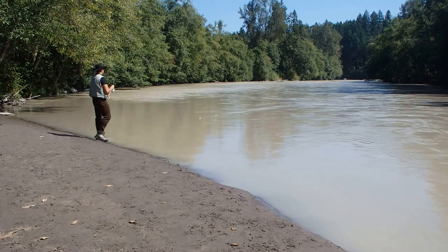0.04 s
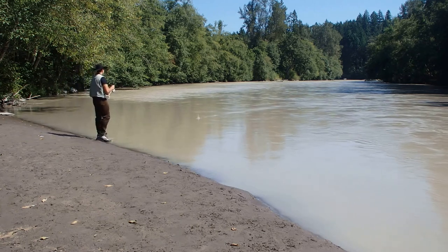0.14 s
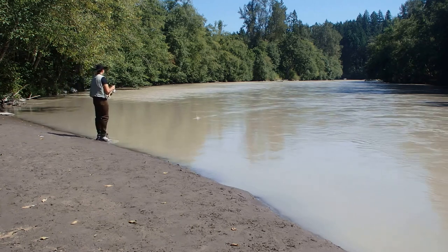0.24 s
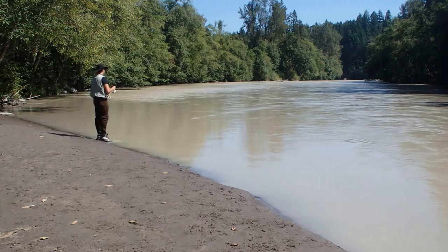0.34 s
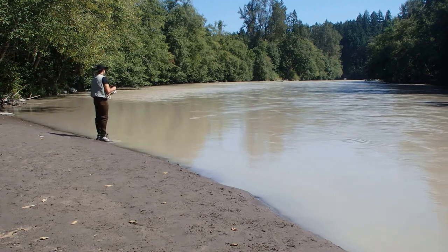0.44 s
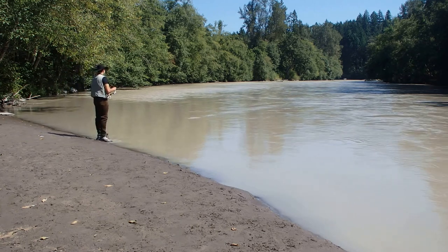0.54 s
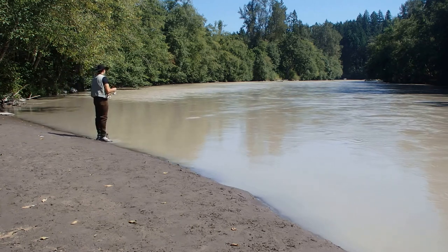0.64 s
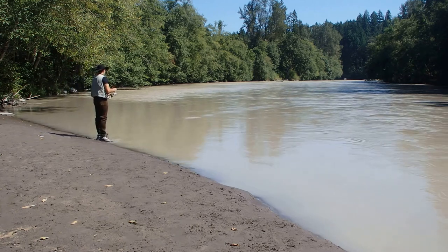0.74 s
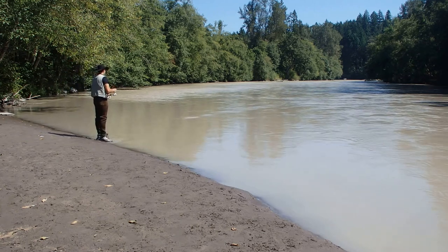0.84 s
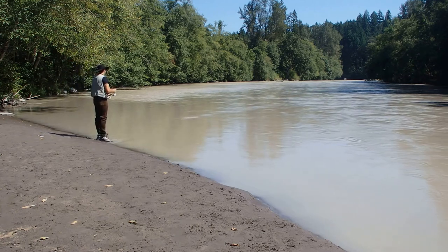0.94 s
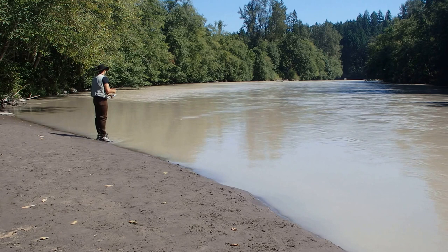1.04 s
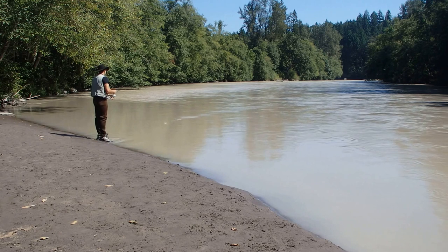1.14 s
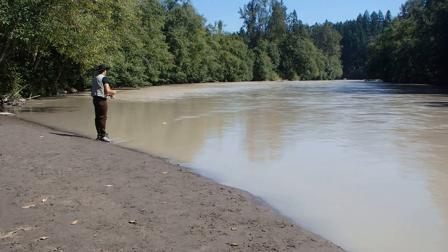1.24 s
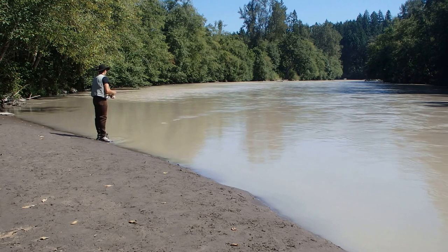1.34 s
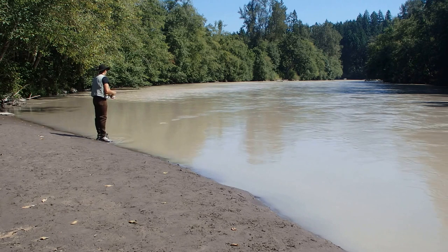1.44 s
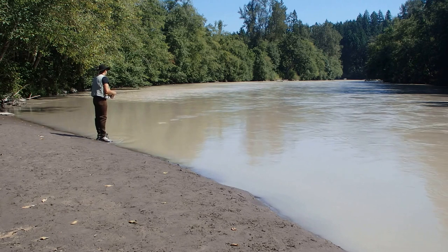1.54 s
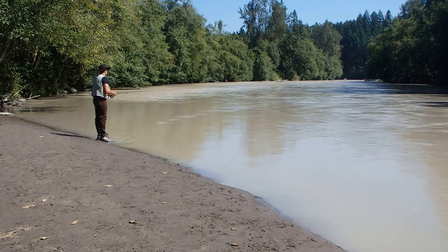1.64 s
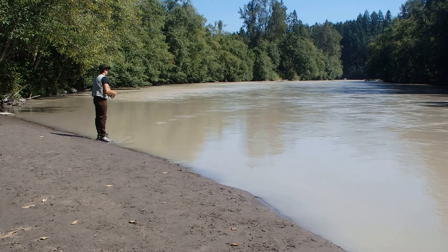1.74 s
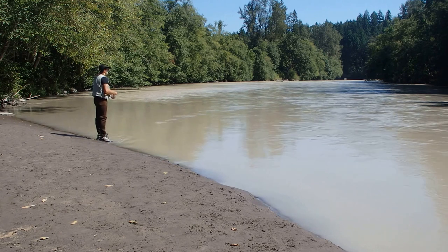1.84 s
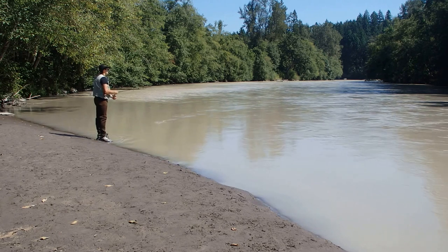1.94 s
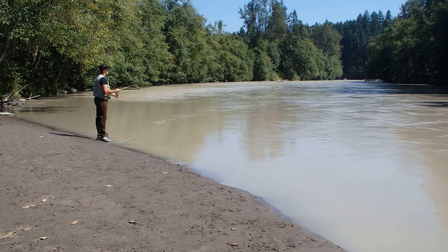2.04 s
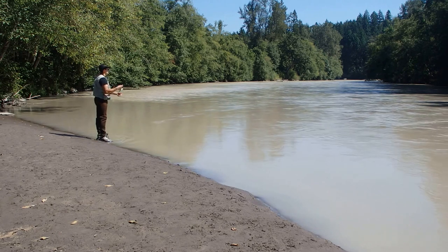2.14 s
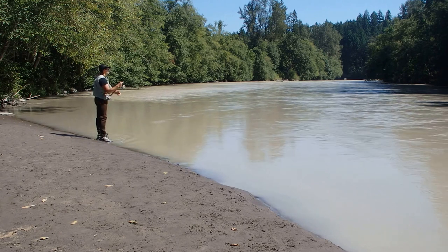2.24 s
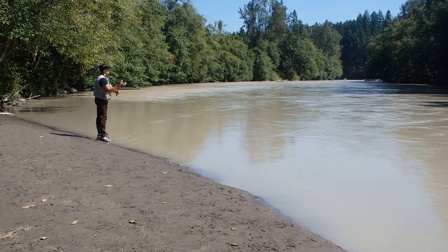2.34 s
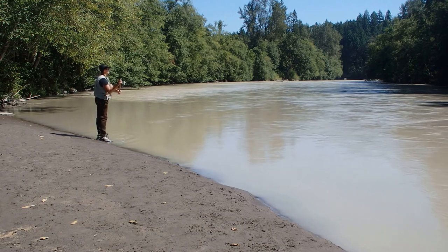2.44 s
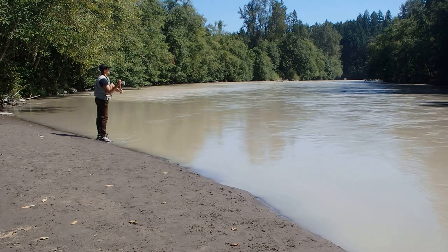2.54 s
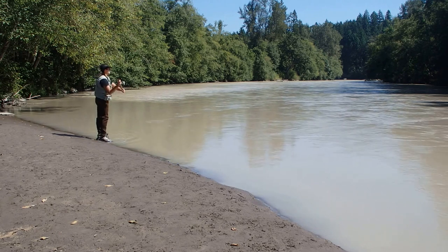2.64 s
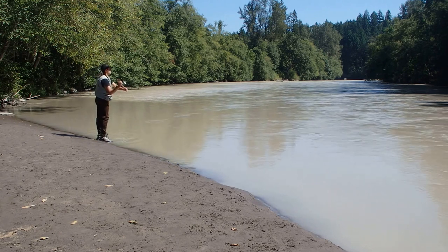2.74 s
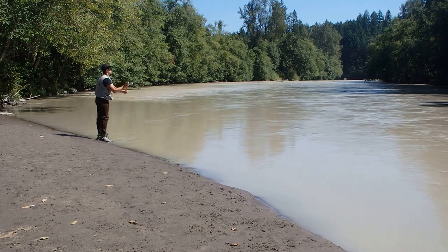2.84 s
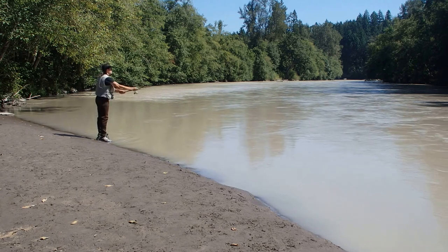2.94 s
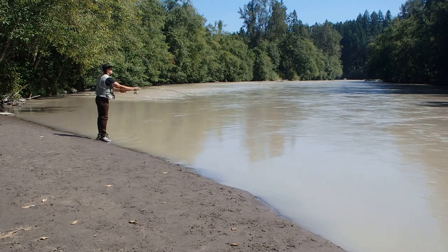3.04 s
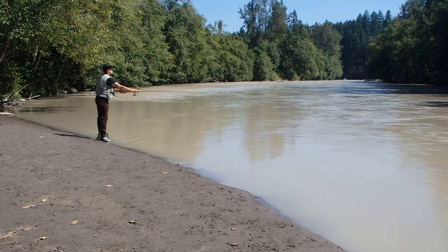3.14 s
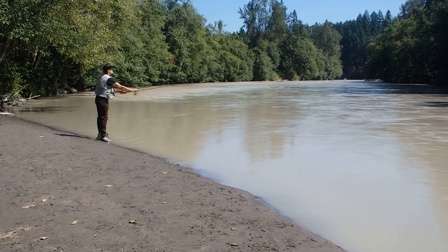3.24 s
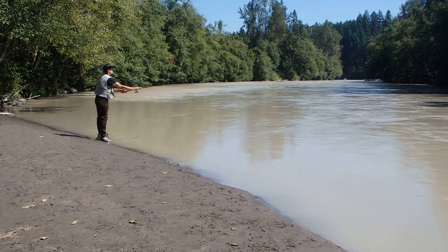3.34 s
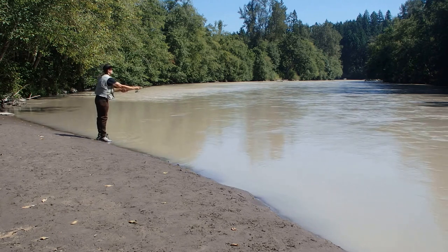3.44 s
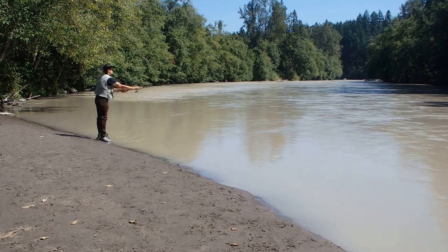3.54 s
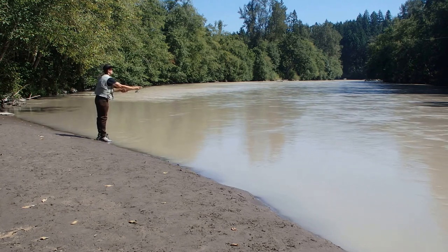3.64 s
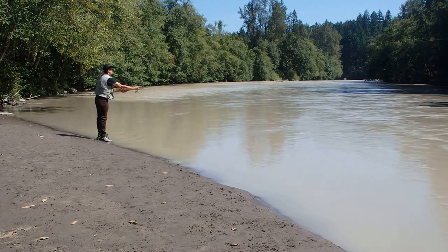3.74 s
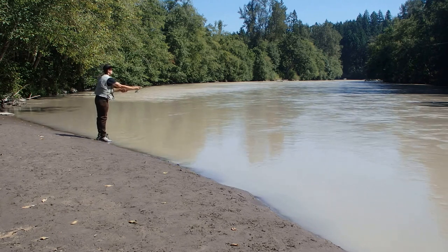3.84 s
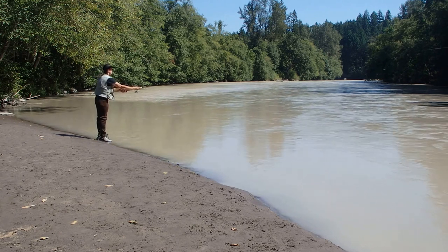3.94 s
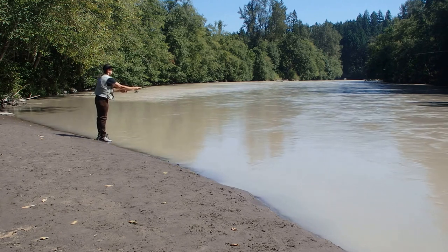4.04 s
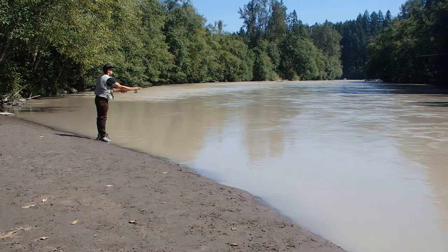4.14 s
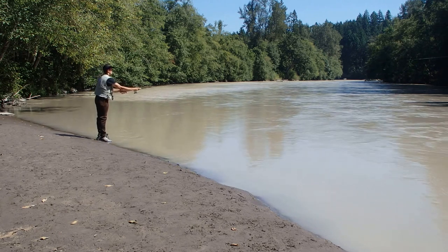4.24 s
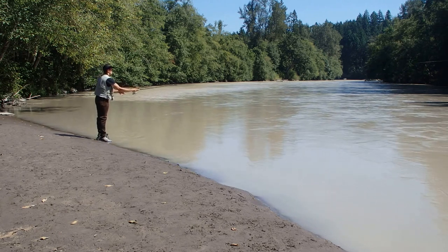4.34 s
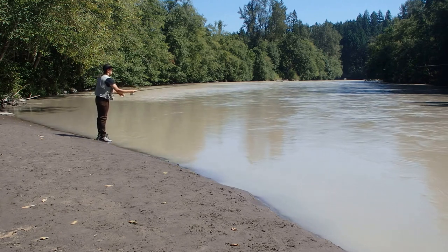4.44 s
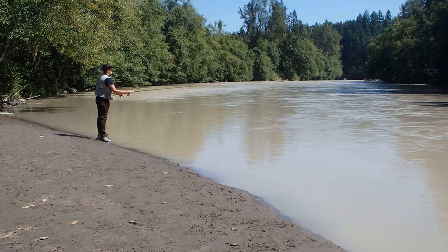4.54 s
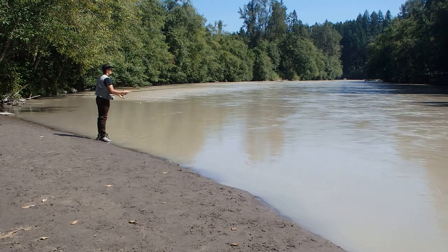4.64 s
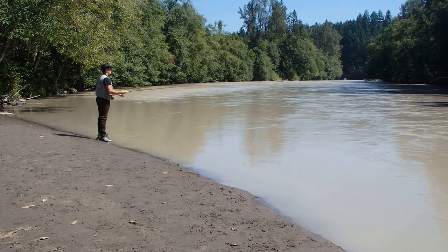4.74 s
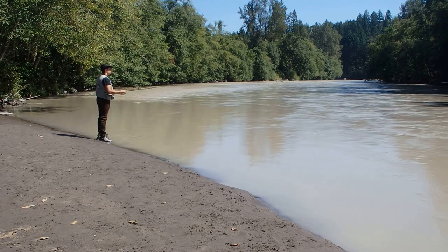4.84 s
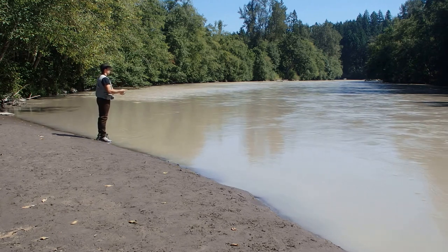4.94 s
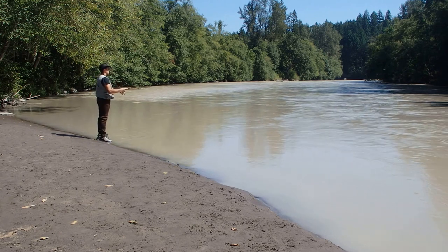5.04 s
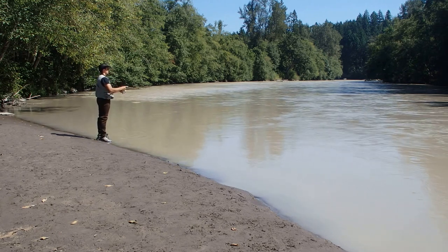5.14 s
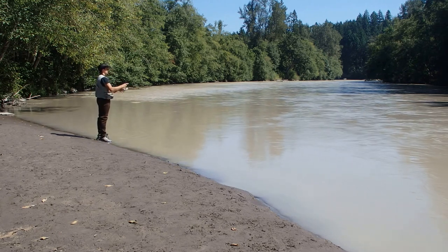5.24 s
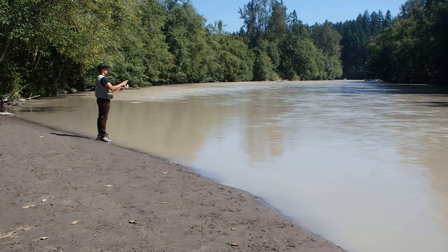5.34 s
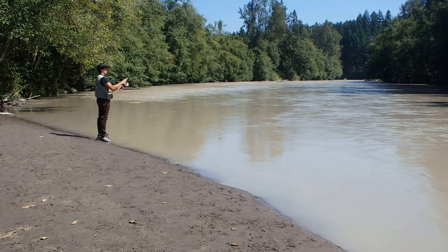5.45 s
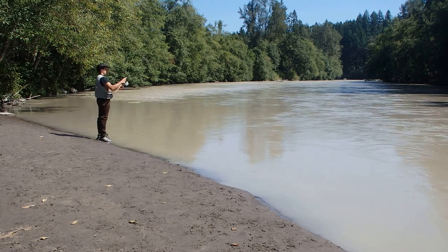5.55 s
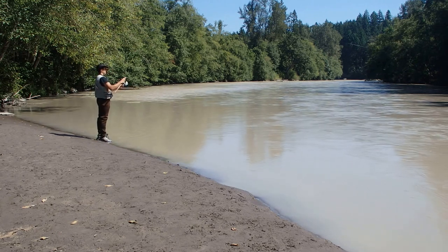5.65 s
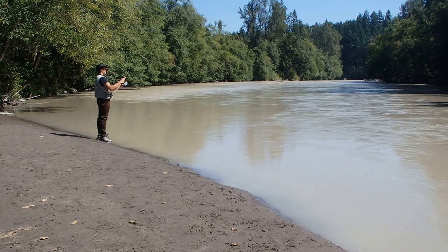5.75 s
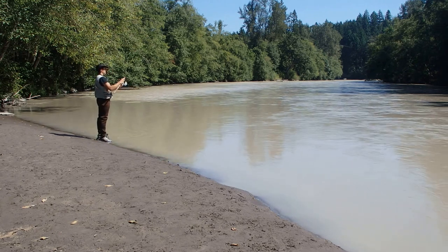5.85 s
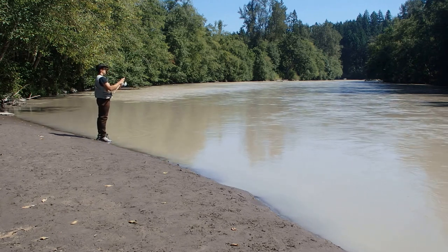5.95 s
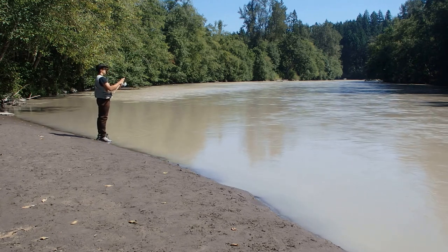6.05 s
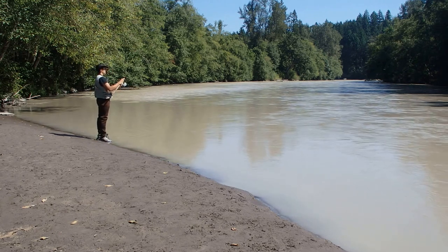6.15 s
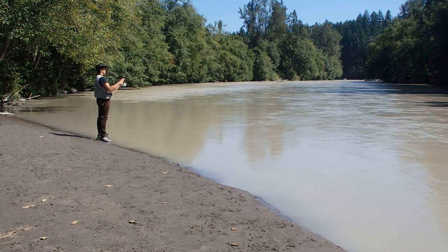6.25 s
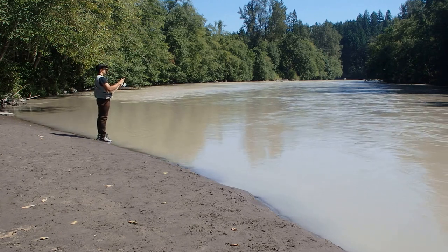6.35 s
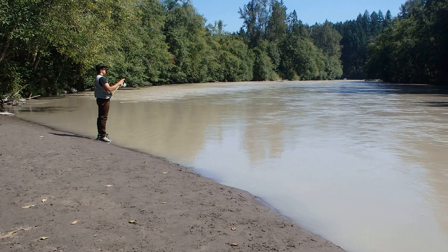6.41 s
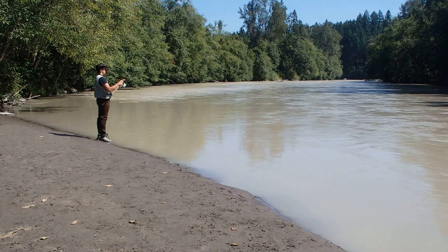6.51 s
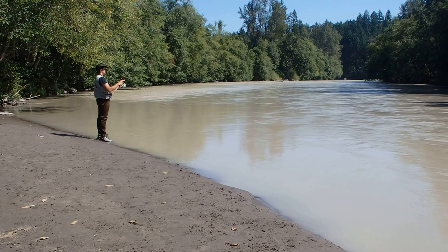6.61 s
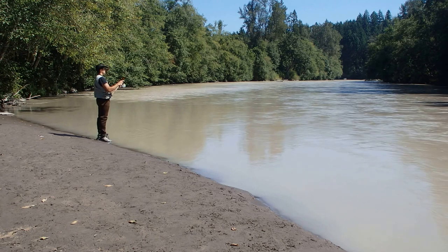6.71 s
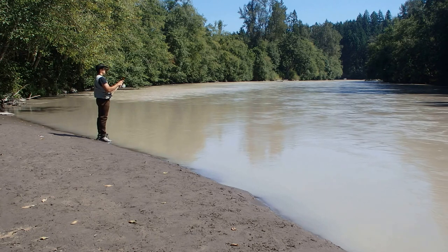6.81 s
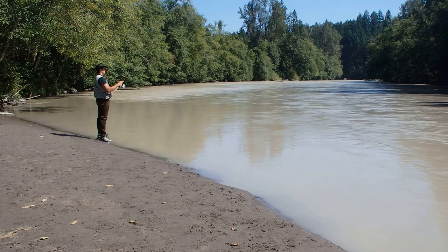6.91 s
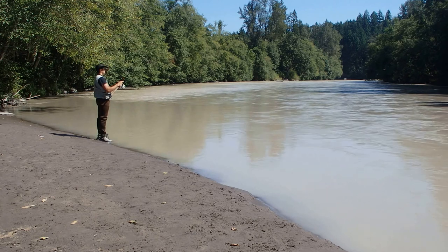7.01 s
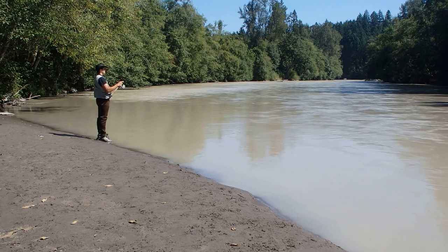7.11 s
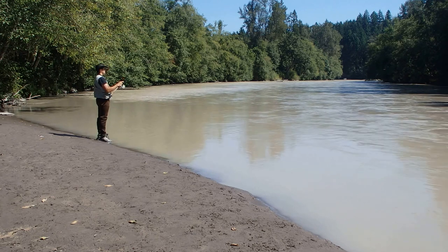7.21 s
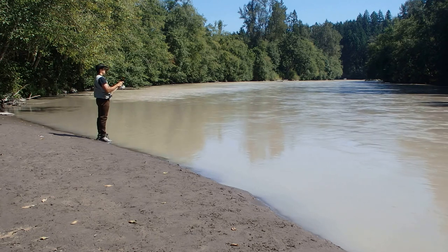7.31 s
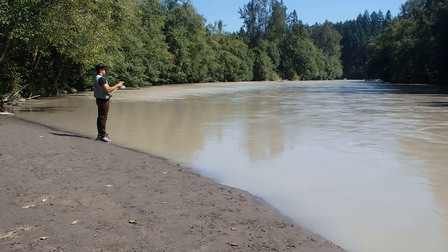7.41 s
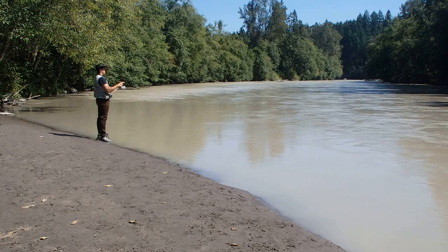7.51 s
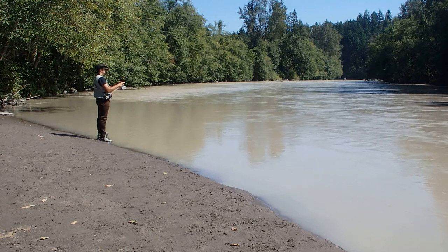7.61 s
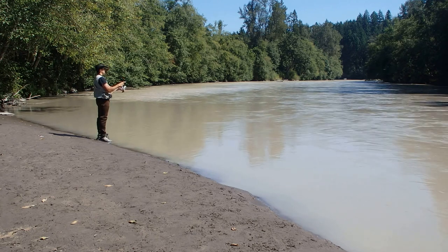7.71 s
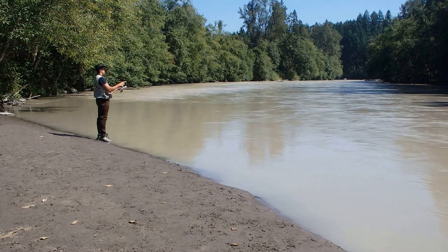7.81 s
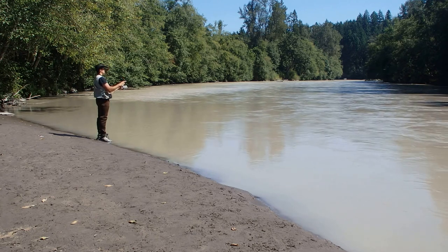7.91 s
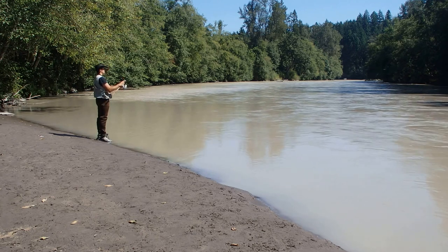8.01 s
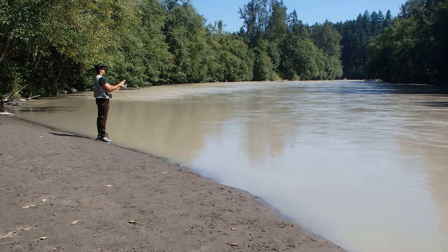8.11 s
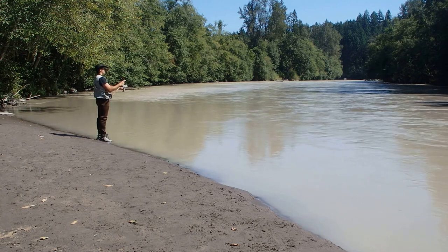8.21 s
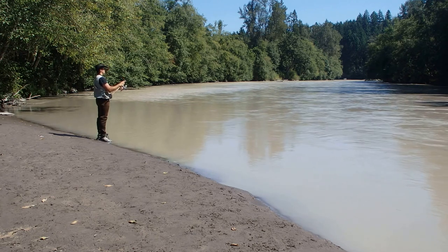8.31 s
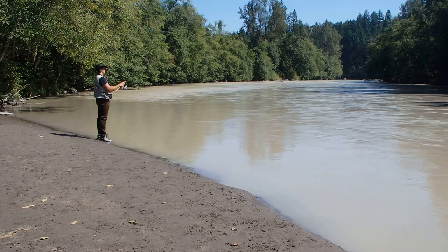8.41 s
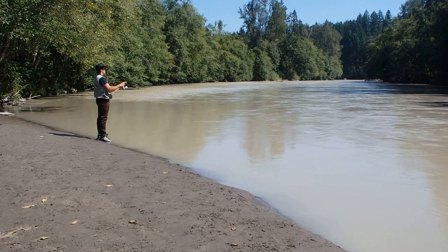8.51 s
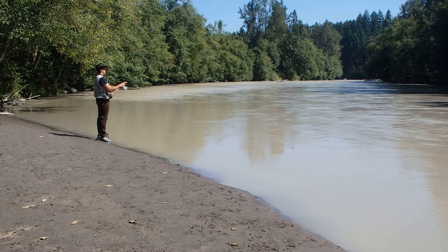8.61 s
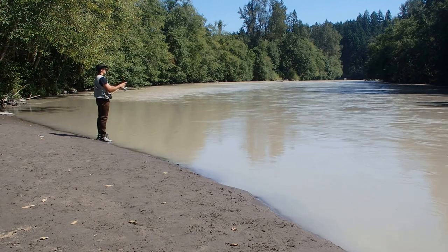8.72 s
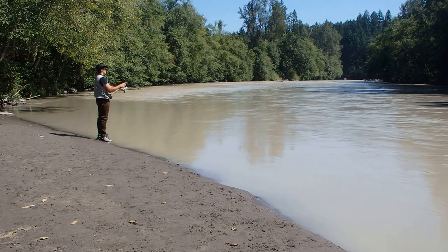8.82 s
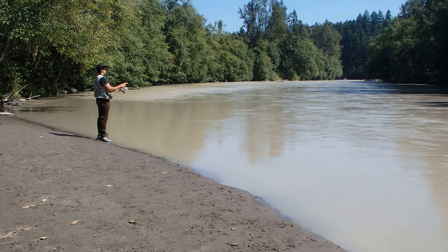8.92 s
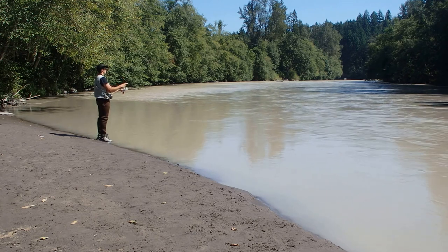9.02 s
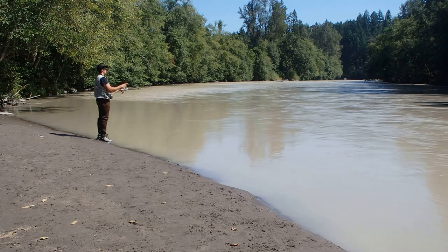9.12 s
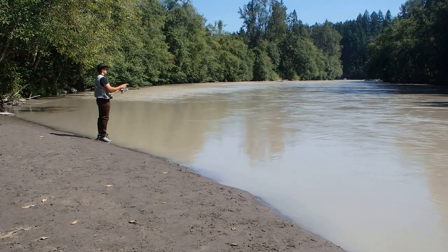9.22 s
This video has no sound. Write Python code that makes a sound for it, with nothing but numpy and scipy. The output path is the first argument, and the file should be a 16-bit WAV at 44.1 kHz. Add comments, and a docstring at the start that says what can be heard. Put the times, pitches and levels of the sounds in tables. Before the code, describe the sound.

Throughout, a wide, even river murmur with a fine fizz of bubbles sits over a slowly heaving low rumble, a faint wavering hum and light microphone hiss. At 0.3 to 0.6 seconds, a few small dry reel ticks come from the left, under a barely audible high whistle. Around 1.4 to 1.8, more faint ticks and several watery plips, one lower and rising quickly. From 2.5 a very thin, high line hiss flutters; near 3.0 the lure breathes past, and at 3.2 the rod whips forward in one loud, bright, airy swish lasting about a tenth of a second. Trees return a diffuse, fading tail for about a second. At 5.1 the reel snaps shut in a rapid cluster of metallic clacks, with one lighter tick after. Then the river continues, with scattered plips from 6.5 to 7.9, the faint whistle near 7.3, and two weak ticks around 7.4 and 7.65, ending on water and rumble at 9.3.

```python
"""A sandy river bank, a small camera, an angler to its left; the river murmurs all around, as noise with tiny
bubbles over a far rumble and a low wavering hum, and rising sine bubbles plip at the edge now and then.
First the reel ticks, as ringing modes, under a faint far whistle; line and lure hiss on the back swing and
the rod whips forward, as tones of shed eddies in a broad wake. The trees answer as a late, decaying noise
tail. Then the reel clacks shut, and near the end the whistle and a few reel ticks return."""
import sys
import numpy as np
from scipy import signal
from scipy.fft import rfft, irfft, next_fast_len
from scipy.io import wavfile
from scipy.ndimage import uniform_filter1d, minimum_filter1d, map_coordinates

SR = 44100
rng = np.random.default_rng(int(sys.argv[2]) if len(sys.argv) > 2 else 0)


def wav_record(signal):
    """Record a signal, one row per channel, as 16-bit PCM in the file named by sys.argv[1]."""
    frames = np.transpose(np.atleast_2d(signal))
    bounded = np.clip(frames, -1, 1)
    # unit amplitude maps onto the largest positive 16-bit level
    quanta = np.round(bounded * 32767).astype(np.int16)
    wavfile.write(sys.argv[1], SR, quanta)


N = 408807

# Shade of the camera body on the right port, for sound from the left: f/Hz, level/dB
BODY_SHADE = [(1000, 0), (2400, 0), (3400, .5), (4200, -1), (5000, -7), (5800, -17), (7200, -22),
              (11000, -18)]


def amp(db):
    """dB to gain."""
    return 10 ** (np.asarray(db) / 20)


def unit(x):
    """x at rms 1."""
    return x / np.sqrt(np.mean(np.abs(x) ** 2) + 1e-20)


def along(points, hz):
    """Read a table of f/Hz and value at hz, straight lines on a log frequency axis."""
    f, value = np.transpose(points)
    return np.interp(np.log(hz + 1), np.log(f + 1), value)


def curves(rows):
    """One value per sample for each column after the time."""
    s, *columns = np.transpose(rows)
    return [np.interp(np.arange(N) / SR, s, column) for column in columns]


def wobble(rate):
    """A smooth random curve with rate knots a second."""
    knots = rng.standard_normal(int(N * rate / SR) + 4)
    return map_coordinates(knots, [np.arange(N) * rate / SR])


def swell(t, loudest_s, db, rise_s, fall_s):
    """A rounded level in dB, 20 dB down at rise_s before and fall_s after its loudest moment."""
    return db - 20 * ((t - loudest_s) / np.where(t < loudest_s, rise_s, fall_s)) ** 2


def filtered(x, response):
    """x times a complex response of frequency."""
    m = next_fast_len(N + SR // 2)
    hz = np.fft.rfftfreq(m, 1 / SR)
    return irfft(rfft(x, m) * response(hz), m)[..., :N]


def ports(hz, left_minus_right_db):
    """Gains of the two microphone ports: a level step, and a phase lead of the left one."""
    # Phase by which the left port leads: f/Hz, lead/rad
    left_lead = [(1000, 0), (2800, 0.27), (3400, 0.73), (4400, 1.4), (5300, 1.7), (6400, 0.68), (9000, 0)]
    side = np.array([[1], [-1]])
    return amp(side * left_minus_right_db / 2) * np.exp(.5j * side * along(left_lead, hz))


def wide(spectrum, pair):
    """Two unrelated signals mixed to a coloured stereo pair of rms 1, as sound from all around."""
    # Likeness of left and right before the port differences: f/Hz, correlation/1
    likeness = [(60, 0.93), (270, 0.92), (740, .96), (2000, 0.93), (3300, 0.99), (5000, 0.9)]
    # Balance of the ports: f/Hz, left minus right/dB
    balance = [(60, 1.5), (450, 0.51), (2000, 0.4), (3300, -1.4), (5000, 2.5)]

    def mid_side(hz):
        turn = np.arccos(np.clip(along(likeness, hz), -1, 1)) / 2
        return amp(along(spectrum, hz)) * [np.cos(turn), np.sin(turn)]

    mid, side = filtered(pair, mid_side)
    left_right = np.array([mid + side, mid - side])
    return unit(filtered(left_right, lambda hz: ports(hz, along(balance, hz))))


def shedding(hz, db, spread, rough):
    """A tone on a moving pitch, blurred by eddies that last 1 / spread cycles; rough = their share of the power."""
    cycles = np.cumsum(hz) / SR
    knots = rng.standard_normal((2, int(cycles[-1] * spread) + 4))
    re, im = (map_coordinates(k, [cycles * spread], order=1) for k in knots)
    rough = np.clip(rough, 0, 1)
    blur = np.sqrt(1 - rough) + np.sqrt(rough) * unit(re + 1j * im)
    return amp(db) * np.sqrt(2) * np.real(blur * np.exp(2j * np.pi * cycles))


def bubbles(s, db, hz, climb, life_cycles):
    """Damped sines with a soft start whose pitch rises as the bubble nears the surface."""
    age = np.arange(900) * hz[:, None] / SR  # cycles of the starting pitch
    life = age / life_cycles  # the ring is 60 dB down at 1
    bend = 1 + np.reshape(climb, (-1, 1)) * life  # acts on phase: the pitch itself gains twice the climb
    soft_start = 1 - np.exp(-age / 0.84)
    tone = np.sin(2 * np.pi * age * bend) * amp(db[:, None] - 60 * life) * soft_start
    at = np.round(s * SR).astype(int)[:, None] + np.arange(age.shape[1])
    return np.bincount(at.ravel(), tone.ravel(), N + SR)[:N]


def hum():
    """Two wavering low tones an octave apart come and go, slightly stronger on the left."""
    # Mean level of the two ports: t/s, low note level/dB, high note level/dB
    hum_levels = [(0.0, -54, -51), (1.0, -57, -54), (1.5, -47, -55), (2.6, -48.5, -47), (3.0, -50, -57),
                  (3.6, -54, -56), (4.0, -48.5, -49), (4.7, -46.5, -66), (5.2, -55, -57.5),
                  (6.3, -42, -53.5), (7.7, -47, -56.5), (8.4, -54, -62.5), (9.27, -41.5, -45.5)]
    low_db, high_db = curves(hum_levels)
    hz = 76.6 + 0.61 * wobble(1.6)
    low = shedding(hz, low_db, .04, 0.15)
    high = shedding(2 * hz, high_db, .06, 0.33)
    return (low + high) * amp([[.7], [-.7]])


def river():
    """Far water is smooth noise; ripples add a fine fizz of tiny bubbles; the rumble heaves slowly."""
    # Slow course of both, before the random wobble: t/s, river level/dB, rumble level/dB
    flow = [(0, -44.5, -42), (1.2, -44, -43), (2.2, -44.5, -42.5), (4.1, -44.2, -41.5), (5.4, -44.5, -44),
            (6.3, -44.5, -40.5), (8.3, -43.5, -41.5), (9.27, -44, -43.5)]
    # Colour of the water, relative: f/Hz, level/dB
    water_colour = [(120, -62), (190, -3), (283, -2), (420, -0.5), (700, -3.5), (1110, -7.5), (2050, -11.5),
                    (2350, -13), (2800, -13.5), (3450, -18), (3650, -22), (3900, -20), (4500, -24),
                    (5500, -28.5), (8000, -44)]
    # Colour of the far rumble, relative: f/Hz, level/dB
    rumble_colour = [(12, -34), (20, -14), (40, 3.5), (70, -0.5), (92, 4.5), (152, -3.5), (184, -9),
                     (220, -13.5), (290, -31), (480, -120)]
    river_db, rumble_db = curves(flow)
    when, size, pitch = rng.random((3, 3000))
    ripples = bubbles(when * N / SR, 6 * size, 1500 * 3.5 ** pitch, .1, life_cycles=12)
    pair = rng.standard_normal((2, N))
    pair[0] += 0.16 * unit(ripples)
    water = amp(river_db + 0.48 * wobble(6)) * wide(water_colour, pair)
    rumble = wide(rumble_colour, rng.standard_normal((2, N)))
    return water + amp(rumble_db + 1.1 * wobble(2.43)) * rumble


def whistle():
    """A faint fuzzy tone far off swells and fades, its narrow band all random blur."""
    # The two swells: loudest t/s, level/dB, rise/s, fall/s
    whistle_swells = [(.3, -72, .35, .25), (7.3, -69, .3, .3)]
    t = np.arange(N) / SR
    level = sum(amp(swell(t, *row)) for row in whistle_swells)
    return level * shedding(np.full(N, 5330), 0, .08, 1)


def trees(x):
    """The wooded banks answer 30 ms late as a noise tail, each frequency dying at its own speed."""
    # Decay of the far tree line: f/Hz, t60/s
    tree_t60 = [(500, .4), (2200, 1.5), (3150, 1.5), (3800, 0.7), (4400, 2.1), (5500, 1), (10000, 1.5)]
    # Colour of the whole answer, relative: f/Hz, level/dB
    leaf_colour = [(700, 12), (1600, 0.5), (2500, -6), (3150, 2), (4300, -1.5), (5500, -8.5), (10000, -2)]
    hz, t, noise = signal.stft(rng.standard_normal((2, SR)), SR, nperseg=256)
    near_bushes = amp(-60 * t / 0.18)
    far_trees = amp(-2.5 - 60 * t / along(tree_t60, hz)[:, None])
    mid, side = signal.istft(noise * (near_bushes + far_trees), SR, nperseg=256)[1]
    tail = np.array([mid + 0.14 * side, mid - 0.11 * side]) / np.linalg.norm(mid)
    delayed = np.pad(x, (round(.03 * SR), 0))
    late = signal.fftconvolve(delayed[None], tail, axes=1)[:, :N]
    return filtered(late, lambda hz: amp(along(leaf_colour, hz)) * ports(hz, -.6 * along(BODY_SHADE, hz)))


def plips():
    """Single drops at the water's edge, each a bubble ringing at a rising pitch."""
    # Drops: t/s, starting level/dB before the soft start, starting f/Hz, climb (half the pitch gained in a life)/1
    drops = [(.349, -40, 3140, 0.092), (0.466, -37, 3050, .1), (1.581, -35, 3760, .1),
             (1.621, -28.5, 1126, 1.6), (1.787, -35, 730, 0.51), (3.12, -32, 2070, .1),
             (3.899, -39, 4000, .1), (4.629, -36, 2010, .2), (6.509, -33, 2040, 0.091),
             (6.929, -37, 3020, .1), (7.22, -40, 3920, .1), (7.547, -36, 3160, .1), (7.91, -43, 1150, .2)]
    return bubbles(*np.transpose(drops), life_cycles=39)


def reel():
    """Each contact rings the same modes at new strengths, some with more knock, some with more clack."""
    # Contacts as the reel is shut and handled: t/s, level/dB, low knock level/dB, bright clack level/dB
    contacts = [(0.2786, -44, -5, 1), (0.3617, -34, -6, -10), (0.379, -34, -7, -9),
                (0.5587, -24, -24, -12.5), (0.567, -40, -6, 2), (1.431, -35, 2, -10), (1.557, -42, 4, 0),
                (1.6095, -43, 1, 1), (5.093, -31, 6, -6), (5.0952, -30.5, 4, -3), (5.0988, -32, -6, -4),
                (5.103, -28.5, 0, -7), (5.1111, -35, -7, -5), (5.1147, -29, -1, -3), (5.1994, -40, 4, -8),
                (7.421, -43, -5, -2), (7.65, -40, -11, -7)]
    # What the reel rings with: f/Hz, relative level/dB, t60/s
    reel_modes = [(1453, -4, 0.026), (1940, 3, 0.009), (2830, 1.5, .006), (3160, -1.5, 0.0091),
                  (3870, 5.5, 0.0093), (4270, 5.5, 0.0054), (7200, 4, .005), (8600, 5, 0.0033),
                  (10200, 2, .004)]
    knock_below_hz, clack_above_hz = 2400, 3500
    out, t = np.zeros(N + SR), np.arange(SR // 10) / SR
    rise = 1 - np.exp(-t / .0004)
    hz, mode_db, t60 = np.transpose(reel_modes)[:, :, None]
    modes = amp(mode_db - 60 * t / t60) * np.sin(2 * np.pi * hz * t)
    scatter_db = 1.5 * rng.standard_normal((len(contacts), len(hz)))
    for (s, db, knock_db, clack_db), chance_db in zip(contacts, scatter_db):
        colour_db = knock_db * (hz < knock_below_hz) + clack_db * (hz > clack_above_hz)
        strengths = amp(db + chance_db + colour_db[:, 0])
        out[round(s * SR):][:len(t)] += rise * (strengths @ modes)
    return out[:N]


def swish():
    """Rod, line and lure shed eddies at a rate of air speed over thickness; the rod drags a turbulent wake."""
    # Rows: lure at the turn of the back swing; thick lower rod; middle; tip; flick as the rod straightens; rebound.
    # Fastest t/s, shedding f/Hz then, width of the speed bell/s, loudest t/s, level/dB, rise/s, fall/s,
    # eddy spread/(1/cycle), roughness/1 (held to 0-1)
    moving_parts = [(2.99, 6500, .25, 2.98, -52, .07, .05, .2, 1),
                    (3.228, 1941, .044, 3.213, -23.5, 0.049, 0.049, .68, 0.9),
                    (3.236, 3095, 0.047, 3.224, -17.5, .03, 0.0074, .3, 0.54),
                    (3.232, 5904, .03, 3.229, -18, 0.019, 0.021, .36, 1.06),
                    (3.233, 3930, 0.036, 3.232, -14, 0.0063, 0.0035, .25, 0.5),
                    (3.261, 3273, .05, 3.24, -21, 0.0088, 0.021, .2, 0.45)]
    # The thin line sheds far higher: t/s, level/dB before the flutter, shedding f/Hz
    thin_line = [(2.45, -68, 9670), (2.55, -54, 9660), (2.64, -61, 9900), (2.69, -54, 9740),
                 (2.82, -45, 9350), (2.95, -51, 10030), (2.995, -49, 10000), (3.068, -57, 9320),
                 (3.125, -47, 9900), (3.14, -54, 9500), (3.2, -45, 9430)]
    # Wake of the whole rod, a burst inside a longer swell: loudest t/s, level/dB, rise/s, fall/s
    wake_swells = [(3.228, -26, 0.025, 0.039), (3.27, -34.5, .14, 0.12)]
    # Colour of the wake, relative: f/Hz, level/dB
    wake_colour = [(500, -40), (1200, -5), (2500, 4), (5000, -2), (7000, -7), (8200, -10.5), (9500, -8),
                   (12000, -22), (15000, -35)]
    air, t = np.zeros(N), np.arange(N) / SR
    for fastest_s, top_hz, width_s, loudest_s, db, rise_s, fall_s, spread, rough in moving_parts:
        span = slice(round((loudest_s - .125) * SR), round((loudest_s + .125) * SR))
        hz = top_hz / (1 + ((t[span] - fastest_s) / width_s) ** 2)
        level_db = swell(t[span], loudest_s, db, rise_s, fall_s)
        air[span] += shedding(hz, level_db, spread, rough)
    span = slice(round(thin_line[0][0] * SR), round(thin_line[-1][0] * SR))
    line_db, line_hz = curves(thin_line)
    flutter_db = 2.2 * wobble(60)
    air[span] += shedding(line_hz[span], (line_db + flutter_db)[span], 0.41, 0.95)
    rush = unit(filtered(rng.standard_normal(N), lambda hz: amp(along(wake_colour, hz))))
    return air + sum(amp(swell(t, *row)) for row in wake_swells) * rush


def scene():
    """The angler and the drops are to the left, the right port in shade; the river lies all around."""
    near = swish() + reel() + plips()
    direct = filtered(near, lambda hz: ports(hz, 0) * amp([0 * hz, along(BODY_SHADE, hz)]))
    return direct + amp(-14.5) * trees(near) + river() + hum() + whistle()


def record(dry):
    """Resonances of the microphone ports, the hiss of each amplifier, a quick peak limiter, the band limit."""
    # Port resonances: f/Hz, width/Hz, level/dB of the resonant part added to the direct sound
    port_modes = [(3190, 270, 4.5), (4270, 950, 1.5)]
    # Colour of the amplifier hiss, relative: f/Hz, level/dB
    hiss_colour = [(1000, -9.5), (4000, -1.5), (7000, -1.5), (14000, -0.5), (15800, -4.5)]
    ceiling, top_hz = .91, 15750

    def port(f):
        return 1 + sum(amp(db) * 1j * f * w / (c * c - f * f + 1j * f * w) for c, w, db in port_modes)

    hiss = unit(filtered(rng.standard_normal((2, N)), lambda hz: amp(along(hiss_colour, hz))))
    x = filtered(dry, port) + amp(-51) * hiss
    needed = ceiling / np.maximum(np.abs(x).max(axis=0), ceiling)
    gain = uniform_filter1d(minimum_filter1d(needed, size=121), size=61)  # windows in samples
    return filtered(x * gain, lambda hz: hz < top_hz)


dry = scene()
out = record(dry)
wav_record(out)
```